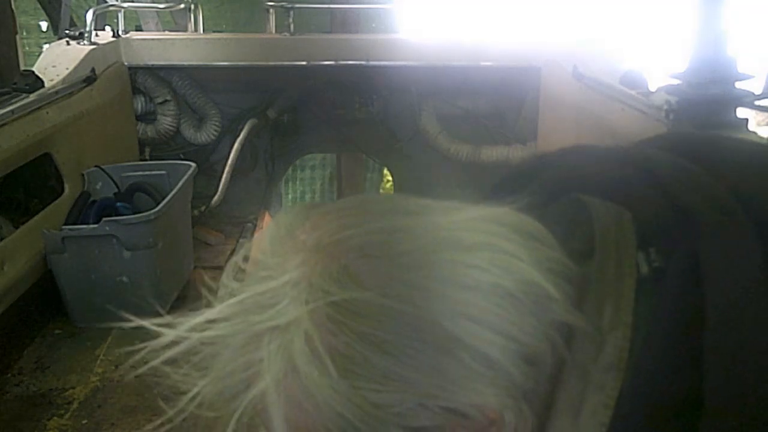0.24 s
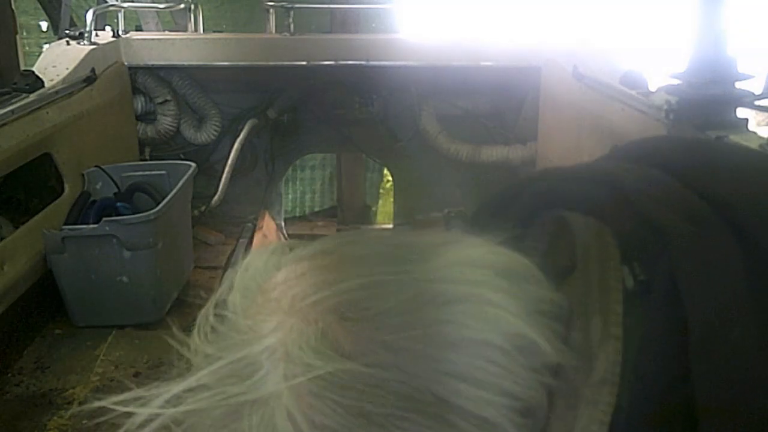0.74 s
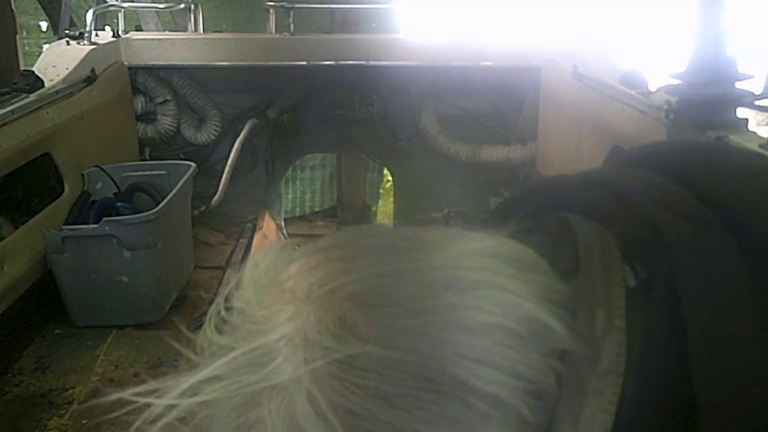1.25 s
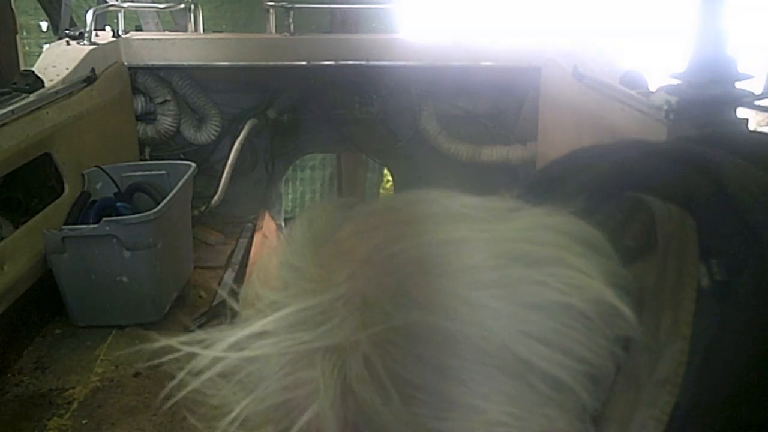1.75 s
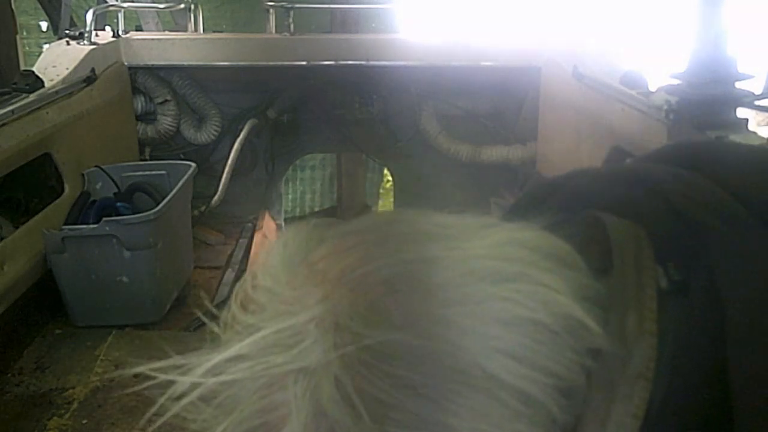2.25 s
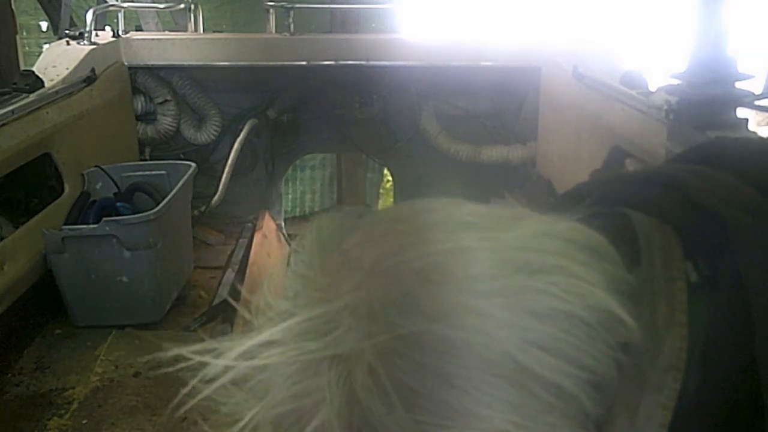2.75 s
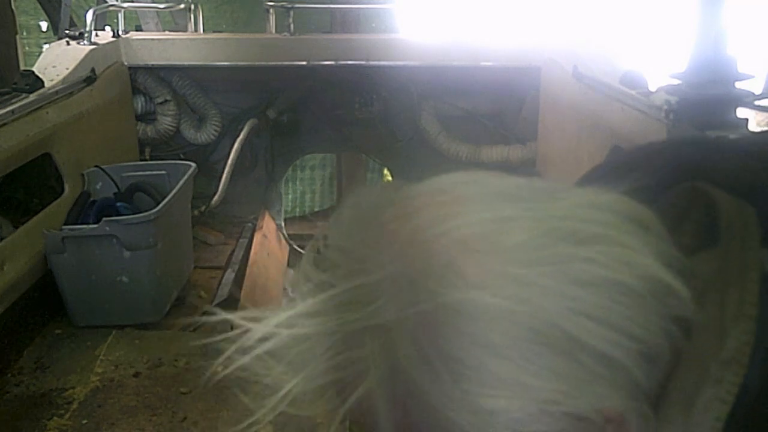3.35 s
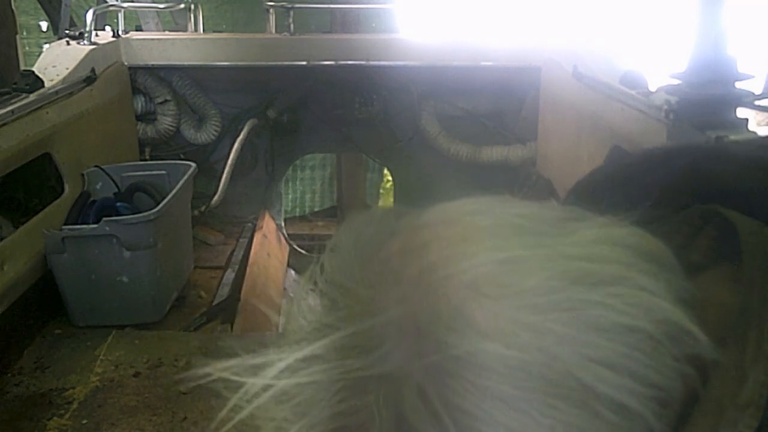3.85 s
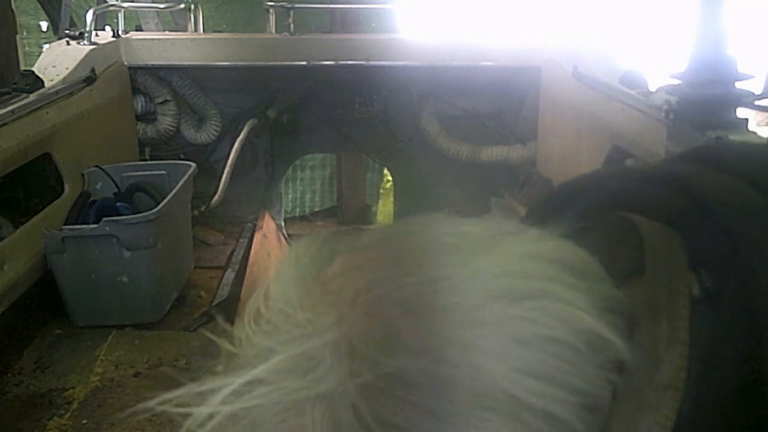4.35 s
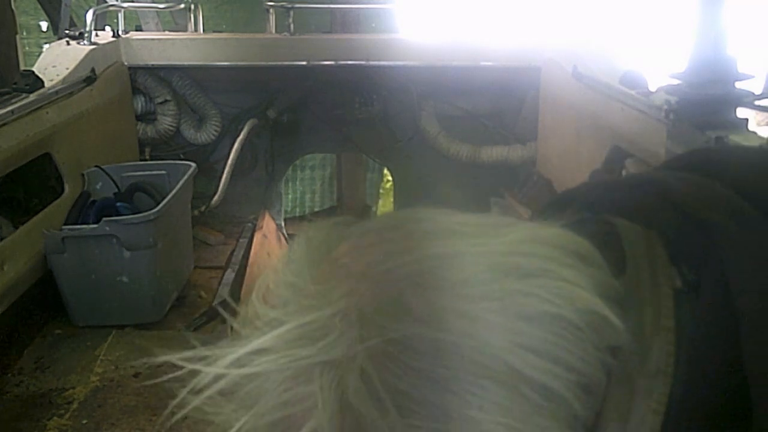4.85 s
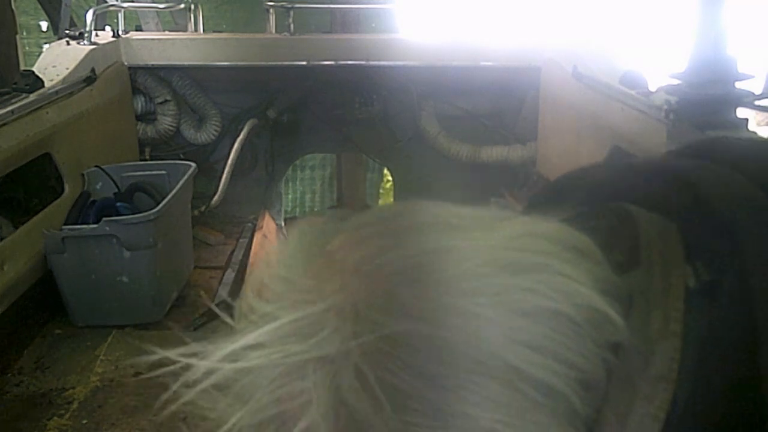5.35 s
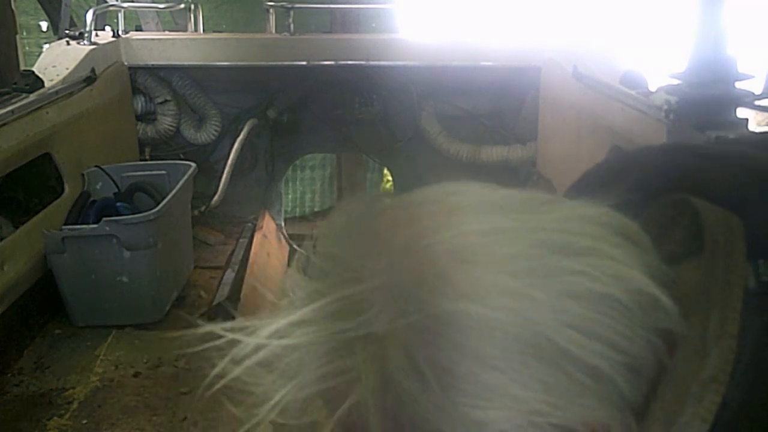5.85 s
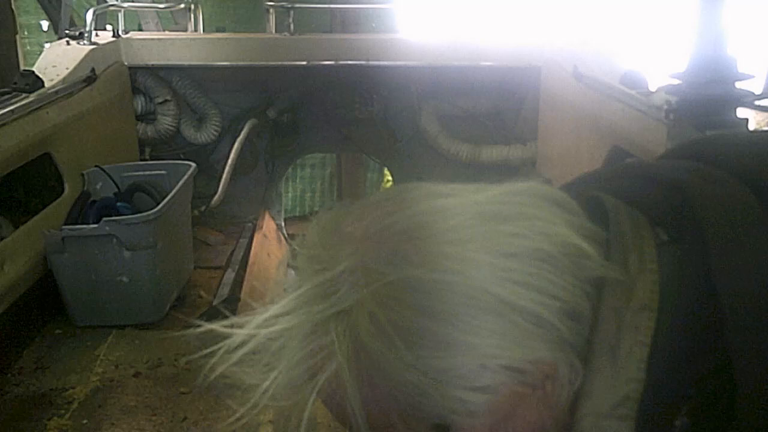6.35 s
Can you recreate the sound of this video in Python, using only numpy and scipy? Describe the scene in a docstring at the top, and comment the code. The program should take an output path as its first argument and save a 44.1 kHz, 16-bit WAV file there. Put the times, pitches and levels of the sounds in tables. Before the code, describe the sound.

A plywood floor is pried from a fiberglass boat indoors, over a low machine hum and the soft rumble of the hull rocking. Around 0.5 seconds the loose sheet gives a few dull knocks. From 1 to 1.5 seconds wood splinters with sharp cracks, crackling fibers and a rasping edge. A brief hollow groan and faint scrape follow, then woody thuds from 1.8 to 2.3 seconds. A second run of cracking and tearing lasts from about 2.8 to 3.5 seconds, trailing into faint crackle as the hum grows louder. The sheet thumps the hull at 4 and 4.3 seconds, with soft scuffing around it. Sharp snaps return from 5.2 to 5.5 seconds, followed by bumps near 5.6 and 6 seconds, a couple of small cracks and a tiny tick. The close, dull microphone overloads slightly on the loudest blows.

```python
"""Prying a plywood floor out of a fibreglass boat

Wood fibres tear in runs of crackle and sharp cracks. The loose sheet knocks on the hull,
rasps as its edge drags and groans as it bends. Shifting weight flexes and rocks the boat,
and a machine hums in the room. The loudest blows overload a dull-sounding microphone."""
import sys
import numpy as np
from scipy import signal
from scipy.fft import rfft, irfft
from scipy.io import wavfile
from scipy.ndimage import uniform_filter1d

SR = 44100
rng = np.random.default_rng(int(sys.argv[2]) if len(sys.argv) > 2 else 0)


def to_wav(sig):
    """Store sig (one row per channel, or 1-D mono) as 16-bit WAV at the path in sys.argv[1].

    Samples outside -1..1 are clipped; the rate is SR.
    """
    pcm = np.clip(np.atleast_2d(sig), -1, 1) * 32767
    pcm = np.round(pcm).astype(np.int16)
    wavfile.write(sys.argv[1], SR, pcm.T)  # frames by channels


N = 290619
TIME = np.arange(N) / SR
LEAD_S = 0.002016  # a blow starts this long before its listed time

# overall tone of splintering wood: pitch_hz, level_db
SPLINTER_TONE = [(90, -28), (200, -9.5), (320, 0), (430, -11), (600, -11), (1000, -11), (1700, -9.5),
                 (2400, -4.5), (2900, -10), (3700, -19), (4300, -36), (5200, -47), (6200, -42.5),
                 (7200, -39)]
# pitches at which that wood rings: pitch_hz, width_hz, boost_db
SPLINTER_RINGS = [(335, 60, 6.5), (726, 23, 10.5), (917, 32, 3), (1017, 68, 5), (1168, 17, 5),
                  (1422, 77, 8), (1680, 20, 5), (1664, 8, -9.5), (2000, 18, 8.5), (2450, 8.1, 2.5),
                  (3505, 96, 2.5)]
# shifts of weight in the boat: time_s, flex_db, rocking_db
WEIGHT_SHIFTS = [(0.6, -34.5, -32.5), (1.3, -31, -41), (1.79, -29.5, -36), (2.04, -28.5, -43.5),
                 (2.28, -39.5, -25.5), (2.99, -58, -29), (3.66, -39, -43), (4.33, -36, -25),
                 (4.761, -56.5, -33.5), (5.572, -34.5, -32), (6.38, -43, -32)]


def cracks(note_width=0.11, note_boost_db=15.5):
    """Layers of plywood snap, each with a bright burst that rings the broken piece."""
    # deeper snaps have more bass and middle: start_s, level_db, depth_db, fade_s, pitch_hz
    snaps = [(1.049, -13.5, -7.5, 0.0041, 2110), (1.097, -29, 7, 0.0068, 1820),
             (1.17, -20.5, -2.5, .01, 1480), (1.222, -17, 4, 0.0088, 1460), (1.244, -23, 7, 0.0054, 1650),
             (1.261, -11.5, 4.5, 0.02, 1060), (1.280, -26, 12, 0.0042, 1650), (1.315, -14.5, 3, 0.013, 667),
             (1.35, -19, -4, .005, 2210), (1.387, -23.5, -9, 0.0043, 2310),
             (1.430, -8, -10.5, 0.0087, 2300), (2.836, -29.5, -13, .008, 2300),
             (2.893, -26.5, 11, .007, 460), (2.929, -14.5, 1.5, 0.0063, 2000),
             (2.951, -13, -2.5, .008, 2290), (3.06, -21.5, -6.5, 0.0088, 2300),
             (3.169, -26.5, -11, 0.011, 2230), (3.203, -28.5, 4, 0.013, 510),
             (3.299, -20.5, -1, 0.0062, 3400), (3.361, -28.5, 2.5, 0.0081, 1550),
             (3.444, -22.5, -1.5, 0.0083, 2710), (3.634, -44.5, 15.5, 0.036, 580),
             (3.727, -39, 9, 0.0055, 1000), (3.767, -36.5, 3, .008, 1580), (3.874, -35.5, 4.5, .008, 1720),
             (5.196, -21.5, -8, 0.012, 2350), (5.239, -18, -8.5, 0.008, 2260),
             (5.292, -22, -6.5, 0.0047, 2330), (5.36, -15, -8.5, 0.0042, 2290),
             (5.413, -8.5, -9.5, 0.0092, 2253), (5.464, -20.5, -9, 0.0039, 2320),
             (6.053, -26, 2, 0.0088, 2310), (6.191, -34, 6, 0.0084, 760)]
    # balance added to every crack: bass_db, middle_db, treble_db
    balance = np.array([-4.5, -6.8, -6.8])
    out = np.zeros(N)
    for start, db, depth, fade, pitch in snaps:
        piece = body(SPLINTER_TONE, SPLINTER_RINGS + [(pitch, note_width * pitch, note_boost_db)])
        bands_db = np.array([db + depth, db + depth, db]) + balance
        add(out, start - LEAD_S, blow(piece, bands_db, fade, rise_s=0.0028, grit=0.69, echo_db=-15.5))
    return out


def crackle():
    """With each pull, small fibres tear in clumps and ring the splintering sheet."""
    # pulls on the sheet: start_s, length_s, level_db, build_s
    pulls = [(0.332, .06, -49, .02), (1.073, 0.3, -21.5, 0.084), (1.38, .07, -37, .05),
             (1.791, 0.032, -36, 0.25), (2.55, 0.012, -48.5, .04), (2.76, 0.13, -42, 0.091),
             (2.835, .04, -38, 0.018), (2.911, 0.068, -19.5, 0.081), (2.983, 0.045, -23.5, .05),
             (3.187, 0.07, -23.5, 0.04), (3.278, 0.19, -25, 0.12), (3.604, 0.39, -42.5, 0.12),
             (4.8, .2, -56, 0.042), (5.21, .12, -28.5, 0.062), (5.384, 0.092, -23.5, 0.057)]
    # the panel's boom, the fibreglass skin and a fine fizz: pitch_hz, width_hz, boost_db
    fibre_rings = [(450, 190, 10), (2330, 100, 8.5), (6940, 1200, 4.5)]
    sheet = body(SPLINTER_TONE, SPLINTER_RINGS + fibre_rings)
    clumps = tiny_snaps(per_s=900, spread_db=3.5) * amp(2.5 * drift(hz=40))
    tearing = unit(through(clumps, sheet))
    effort = together(swell(*pull, release_s=0.08, droop_db=4) for pull in pulls)
    return amp(-2) * in_hull(tearing * effort, echo_db=-3)


def knocks(note_width=0.11, note_boost_db=7):
    """The loose sheet bumps the hull with dull, woody thuds."""
    # bumps: start_s, level_db, tilt_db (step from bass to middle to treble), fade_s, pitch_hz
    bumps = [(0.432, -15, -14, 0.027, 1220), (0.452, -14, -14, 0.042, 1190),
             (0.554, -23.5, -8, 0.038, 1060), (0.585, -10.5, -10, 0.013, 1010),
             (0.604, -22, -4, 0.013, 1510), (1.839, -6.5, -16.5, 0.017, 800),
             (1.869, -23.5, -14.5, 0.051, 742), (1.975, -23, -14.5, 0.053, 735),
             (2.015, -17.5, -14, 0.016, 1060), (2.208, -21.5, -13, 0.073, 710),
             (2.243, -14.5, -11.5, 0.03, 1100), (2.278, -21, -5.5, 0.013, 720),
             (3.966, -4.5, -14, 0.015, 820), (4.234, -23, -9, 0.024, 1400),
             (4.261, -21.5, -5.5, 0.017, 1150), (4.294, -8.5, -6.5, 0.022, 1640),
             (5.598, -14, -16, 0.012, 640), (5.973, -16.5, -22, 0.016, 920)]
    # overall tone of the struck sheet: pitch_hz, level_db
    sheet_tone = [(65, -28.5), (130, -7), (300, -1.5), (450, -8.5), (580, -17.5), (1050, -17.5),
                  (1450, -19.5), (1900, -22.5), (2400, -18.5), (3000, -38.5), (3800, -45.5), (4800, -77.5),
                  (7200, -64.5)]
    # pitches at which it rings: pitch_hz, width_hz, boost_db
    sheet_rings = [(217.5, 8.3, 4.1), (287.8, 37, 7.7), (453, 30, 10.3), (693, 35, 1.5), (1200, 87, 5.9),
                   (1440, 130, 5.6)]
    # balance added to every knock: bass_db, middle_db, treble_db
    balance = np.array([-4.5, -5., -5.])
    out = np.zeros(N)
    for start, db, tilt, fade, pitch in bumps:
        sheet = body(sheet_tone, sheet_rings + [(pitch, note_width * pitch, note_boost_db)])
        bands_db = db + tilt * np.arange(3) + balance
        rise_s = 0.00045 / amp(db)  # a gentler bump stays in contact longer
        add(out, start - LEAD_S, blow(sheet, bands_db, fade, rise_s, grit=0.45, echo_db=-13.5))
        add(out, start, amp(db - 17.5) * bending_note())
    return out


def bending_note(high_hz=380, low_hz=190, glide_s=0.025, rise_s=0.019, fade_s=0.049):
    """The struck sheet's note falls as the sheet goes slack."""
    t = TIME[:SR // 3]
    glide = low_hz + (high_hz - low_hz) * np.exp(-t / glide_s)
    detune = rng.uniform(0.93, 0.98)
    wobble = 1 + 0.14 * unit(uniform_filter1d(rng.standard_normal(len(t)), size=200))
    phase = 2 * np.pi * np.cumsum(glide * detune * wobble) / SR
    return np.sin(phase) * (1 - np.exp(-t / rise_s)) ** 2 * np.exp(-t / fade_s)


def rasp(stage_width_hz=850):
    """The dragging edge slips rapidly, ringing at a pitch that moves with the contact point."""
    # drags of the edge: start_s, length_s, level_db, build_s, first_hz, last_hz
    drags = [(1.014, .02, -33.5, 0.057, 1790, 1950), (1.048, 0.014, -15, 0.015, 2000, 2030),
             (1.121, 0.061, -20, 0.043, 1770, 1485), (1.192, 0.032, -19, .02, 1850, 1480),
             (1.705, .025, -30, 0.055, 1590, 1530), (1.775, 0.051, -32.5, 0.027, 1780, 1910),
             (2.933, 0.033, -16.5, 0.05, 1890, 1980)]
    out = np.zeros(N)
    pole = np.exp(-np.pi * stage_width_hz / SR)
    flat_tone = [(100, 0.0044), (8000, 0.013)]
    slips = through(tiny_snaps(per_s=2100, spread_db=1.5), body(flat_tone, SPLINTER_RINGS))
    for start, length, db, build, first_hz, last_hz in drags:
        pitch = np.interp(TIME, (start, start + length), (first_hz, last_hz))
        # a moving filter: shift the pitch down to zero, smooth in three stages, shift back
        shift = np.exp(2j * np.pi * np.cumsum(pitch) / SR)
        smoothed = signal.lfilter([1 - pole], np.poly([pole] * 3), slips / shift)
        ringing = unit((shift * smoothed).real)
        out += ringing * swell(start, length, db, build, release_s=0.05, droop_db=3)
    return in_hull(out, echo_db=-3.5)


def groan(start_s=1.57, length_s=0.1, pitch_hz=215, bend_hz=26):
    """The bent sheet sticks and slips: a hollow note whose pitch and level rise and fall."""
    arch = np.sin(np.pi * np.clip((TIME - start_s) / length_s, 0, 1))
    pitch = (pitch_hz + bend_hz * arch) * (1 + 0.021 * drift(hz=40))
    phase = 2 * np.pi * np.cumsum(pitch) / SR
    return amp(-21.5) * unit(np.sin(phase) + amp(-20) * np.sin(3 * phase)) * arch ** 2


def tick(start_s=6.2835, level_db=-21, fade_s=0.00006):
    """One tiny dry tick, with no ring."""
    out = np.zeros(N)
    add(out, start_s, amp(level_db) * np.exp(-TIME[:64] / fade_s))
    return out


def scuffing():
    """Rubbing on the floor makes soft swells of noise."""
    # scuffs: start_s, length_s, level_db, build_s
    scuffs = [(0.357, 0.18, -40.5, 0.13), (1.59, 0.2, -44, .1), (3.58, 0.51, -41, .2),
              (4.423, 0.043, -45.5, 0.089), (4.8, 0.15, -41.5, .1), (6.064, 0.22, -39.5, 0.36)]
    # tone of the rubbing: pitch_hz, level_db
    tone = [(150, -6), (300, 2), (600, 1.5), (900, -0.5), (1500, -2), (2000, -8.5), (2500, -12.5),
            (3000, -26.5), (3800, -33), (4500, -59.5), (6000, -49), (7200, -48.5)]
    swells = [swell(*scuff, release_s=0.14, droop_db=1.5) for scuff in scuffs]
    return movement_noise(tone, swells, rest_db=-45, flutter_db=2.02)


def flexing():
    """The hull flexes with a low murmur at each shift of weight."""
    # tone of the flexing hull: pitch_hz, level_db
    tone = [(60, -23.5), (120, 1), (180, 5), (260, -1), (400, -25.5), (900, -41.5), (2000, -72)]
    swells = [swell(time, 0, db, build_s=0.31, release_s=0.25) for time, db, _ in WEIGHT_SHIFTS]
    return movement_noise(tone, swells, rest_db=-49, flutter_db=3)


def rocking(lag_s=0.035):
    """The boat rocks with a deep rumble that peaks just after each shift of weight."""
    # tone of the rumble: pitch_hz, level_db
    tone = [(8, -13), (24, -3.5), (45, -10.5), (65, -15), (110, -19), (200, -38), (800, -84.5)]
    swells = [swell(time + lag_s, 0, db, build_s=0.6, release_s=0.38) for time, _, db in WEIGHT_SHIFTS]
    return movement_noise(tone, swells, rest_db=-33, flutter_db=1.8)


def hum():
    """A machine hums on a few low, wavering notes and grows louder midway."""
    # the machine's notes: pitch_hz, relative_db
    notes = [(97.6, 2.5), (122.5, -15), (150.7, -22.5), (194.6, -22), (581.4, -32)]
    # how its loudness changes: time_s, relative_db
    loudness = [(0.0, -35), (2.2, -36), (3.2, -28), (6.59, -28.5)]
    chord = sum(amp(db + 1.2 * drift(hz=12)) * np.sin(2 * np.pi * pitch * TIME + 0.4 * drift(hz=3.2))
                for pitch, db in notes)
    return amp(-1.5) * unit(chord) * amp(np.interp(TIME, *np.transpose(loudness)))


def blow(response, bands_db, fade_s, rise_s, grit, echo_db):
    """A quick burst of small slips rings a body; bands_db sets its bass, middle and treble."""
    # where bass blends into middle, then middle into treble: from_hz, to_hz
    band_edges = [(500, 950), (1500, 2100)]
    echo = hull_echo()
    size = len(echo)
    t = TIME[:size]
    slips = unit(rng.standard_normal(size) * np.exp(grit * rng.standard_normal(size)))
    burst = slips * (1 - np.exp(-t / rise_s)) * np.exp(-t / fade_s)
    spectrum = rfft(through(burst + amp(echo_db) * echo, response), 2 * size)
    hz = np.fft.rfftfreq(2 * size, 1 / SR)
    bass, below_treble = (np.interp(hz, edges, (1, 0)) for edges in band_edges)
    bands = irfft(spectrum * np.array([bass, below_treble - bass, 1 - below_treble]))[:, :size]
    opening_levels = bands[:, :1100].std(axis=1)  # over the first 25 ms
    return (amp(bands_db) / opening_levels) @ bands


def tiny_snaps(per_s, spread_db):
    """Clicks at random moments, most weak and a few strong."""
    strength = amp(spread_db * np.minimum(rng.exponential(1, N), 3.5))
    return strength * rng.choice([-1, 1], N) * (rng.random(N) < per_s / SR)


def movement_noise(tone, swells, rest_db, flutter_db):
    """Noise that flutters, swells with each movement and settles back to a resting level."""
    noise = unit(through(rng.standard_normal(N), body(tone)))
    return noise * together([amp(rest_db)] + swells) * amp(flutter_db * drift(hz=2.4))


def body(tone, rings=(), size=8192):
    """How an object answers one click, given its overall tone and ringing pitches."""
    hz = np.fft.rfftfreq(size, 1 / SR)
    peaks_db = sum(boost / (1 + (2 * (hz - pitch) / width) ** 2) for pitch, width, boost in rings)
    db = curve_at(tone, hz) + peaks_db
    log_gain = np.log(amp(np.r_[db, db[-2:0:-1]]))
    # minimum phase: all the ringing comes after the click
    response = np.fft.ifft(np.exp(np.conj(signal.hilbert(log_gain)))).real
    return response[:size // 2] * np.hanning(size)[size // 2:]


def hull_echo(size=16384):
    """Sound bounces around the hull; the bass builds up later and rings longer."""
    # how long the hull takes to fade by 60 dB: pitch_hz, ring_s
    ring_times = [(110, 1), (220, 0.28), (400, 0.11), (1000, 0.21), (2300, .2), (5000, 0.18)]
    pitches = np.array(ring_times)[:, 0]
    t, hz = TIME[:size], np.fft.rfftfreq(size, 1 / SR)
    noise = rfft(rng.standard_normal(size))
    echo = np.zeros(size)
    for (pitch, ring_s), share in zip(ring_times, np.eye(len(pitches))):
        band = irfft(noise * curve_at(np.c_[pitches, share], hz))
        echo += band * amp(-60 * t / ring_s) * (1 - np.exp(-t * pitch / 1.8))
    return echo


def in_hull(sound, echo_db):
    """A sound together with its echo in the hull."""
    echo = hull_echo()
    return sound + amp(echo_db) * through(sound, echo / np.linalg.norm(echo))


def swell(start_s, length_s, db, build_s, release_s, droop_db=0):
    """Gain of one effort: up 21 dB in build_s, drooping while held, down 21 dB in release_s."""
    before = np.maximum(start_s - TIME, 0)
    after = np.maximum(TIME - start_s - length_s, 0)
    held = np.interp(TIME, (start_s, start_s + length_s), (0, 1))
    return amp(db - droop_db * held - 21 * (before / build_s + after / release_s))


def together(gains):
    """Joint gain of unrelated efforts: their powers add."""
    return np.sqrt(sum(gain ** 2 for gain in gains))


def drift(hz):
    """A smooth random wobble, mostly slower than hz, with a typical size of one."""
    rates = np.fft.rfftfreq(1024, 1 / 100)
    slow = irfft(rfft(rng.standard_normal(1024)) * np.exp(-(rates / hz) ** 2))
    return unit(np.interp(TIME, np.arange(1024) / 100, slow))


def through(sound, response):
    """Makes every sample of a sound set off the given response to a click."""
    return signal.fftconvolve(sound, response)[:len(sound)]


def curve_at(points, hz):
    """Joins (pitch_hz, value) points with lines, on a scale of octaves."""
    pitches, values = np.transpose(points)
    return np.interp(np.log(hz + 1), np.log(pitches + 1), values)


def add(mix, start_s, sound):
    """Mixes a sound in at a given time."""
    part = mix[max(round(start_s * SR), 0):][:len(sound)]
    part += sound[:len(part)]


def amp(db):
    """Turns decibels into gain."""
    return 10 ** (np.asarray(db) / 20)


def unit(sound):
    """Scales a sound to an average (rms) level of one."""
    return sound / np.sqrt(np.mean(sound ** 2) + 1e-20)


def scene():
    """The breaking floor over the movement in the boat and the hum, in one channel."""
    movement = scuffing() + flexing() + rocking()
    floor = cracks() + knocks() + crackle() + rasp() + groan()
    return (floor + tick() + movement + hum())[None]


def record(dry, ceiling=1.05, cutoff_hz=7400):
    """The microphone overloads, rounding off the loudest peaks, and loses the high treble."""
    rounded = dry / (1 + (dry / ceiling) ** 6) ** (1 / 6)
    treble_cut = signal.firwin(511, cutoff_hz, window=("kaiser", 9), fs=SR)
    return signal.oaconvolve(rounded, treble_cut[None], "same")


dry = scene()
out = record(dry)
to_wav(out)
```